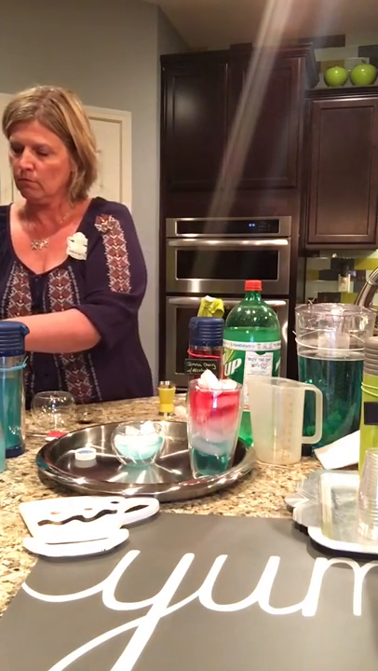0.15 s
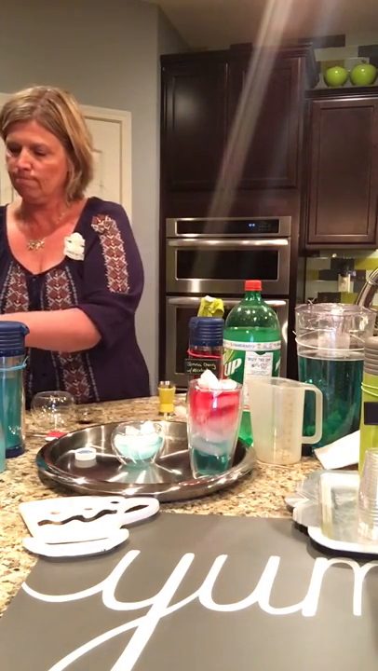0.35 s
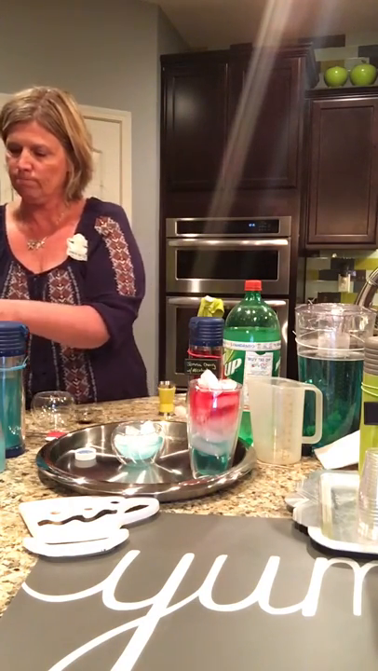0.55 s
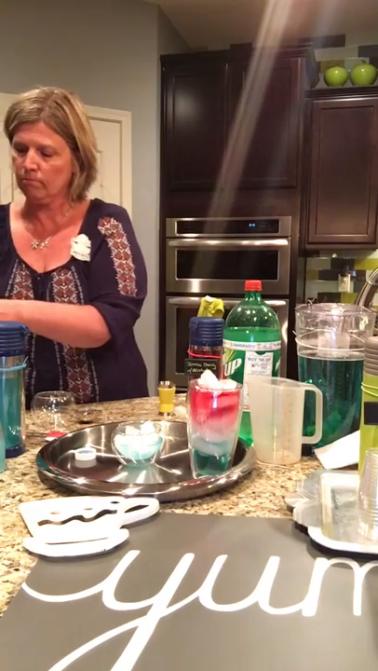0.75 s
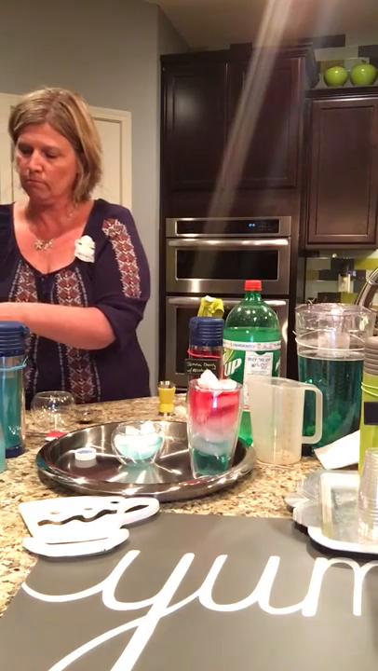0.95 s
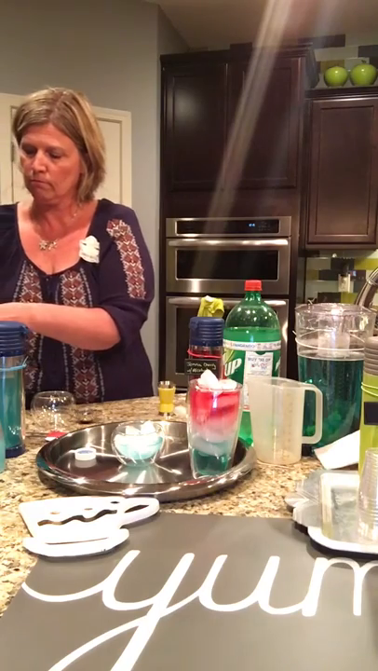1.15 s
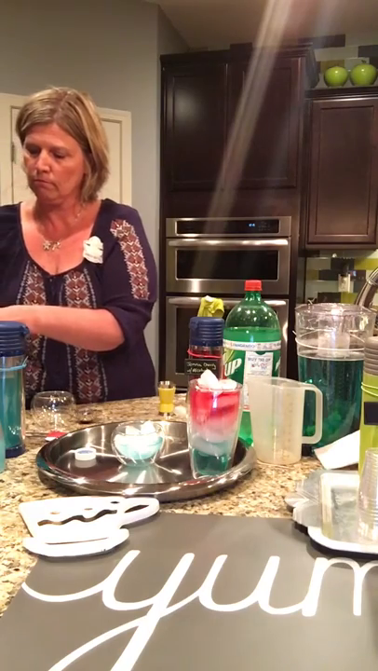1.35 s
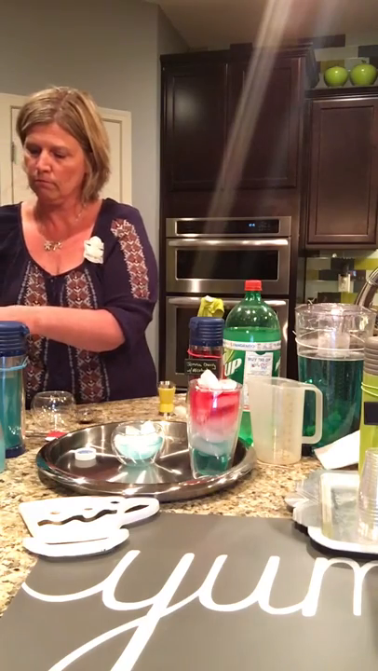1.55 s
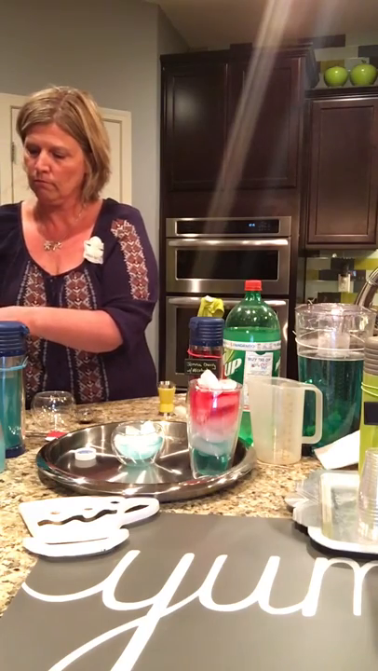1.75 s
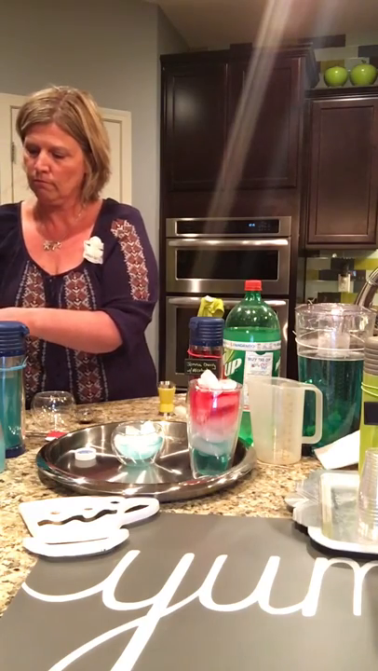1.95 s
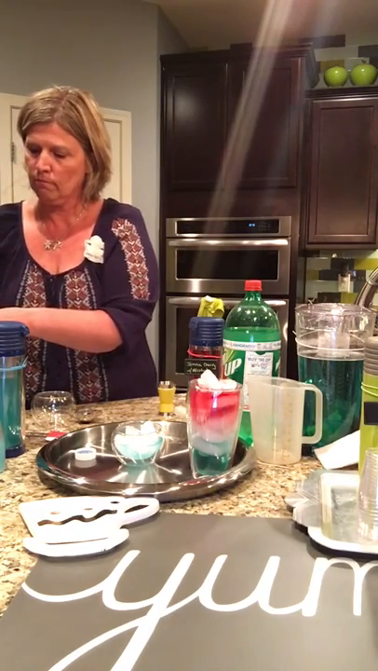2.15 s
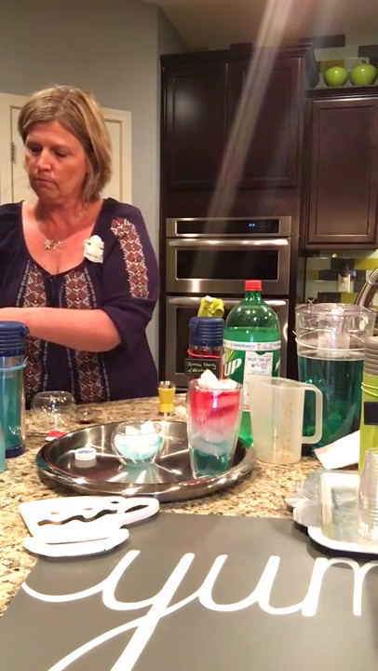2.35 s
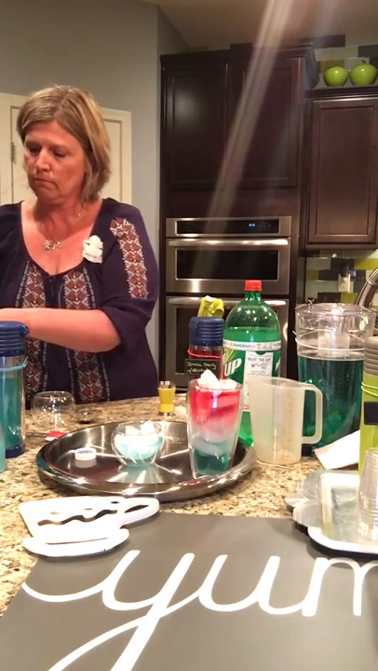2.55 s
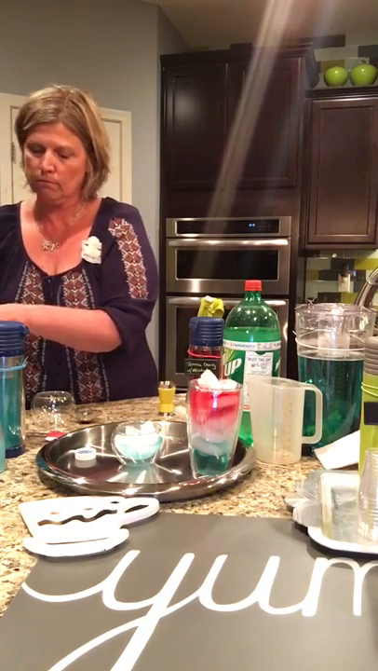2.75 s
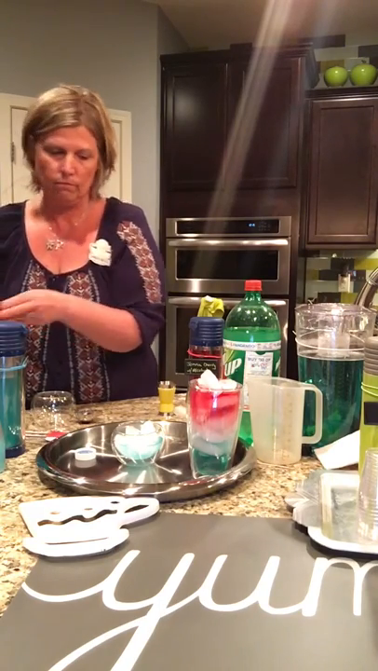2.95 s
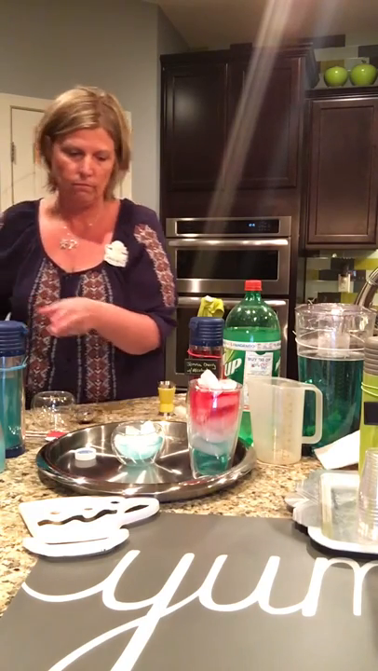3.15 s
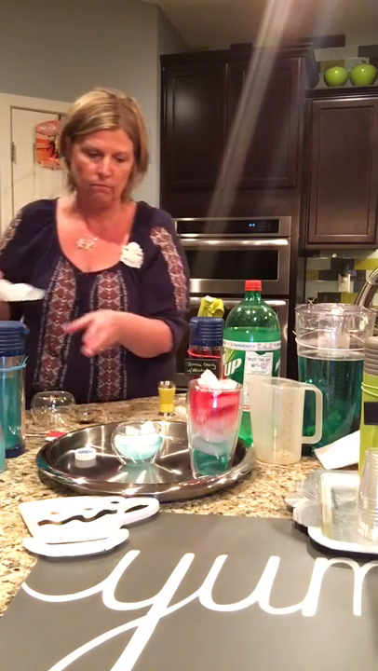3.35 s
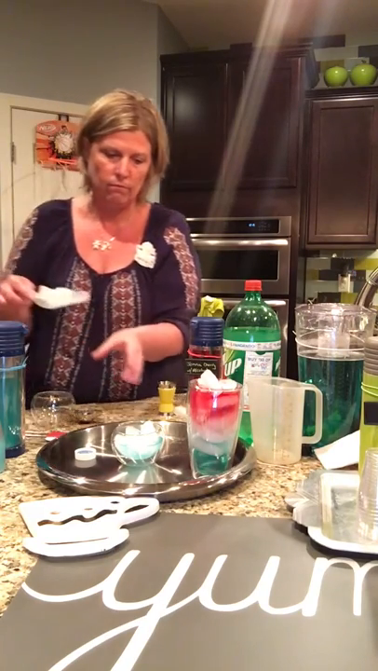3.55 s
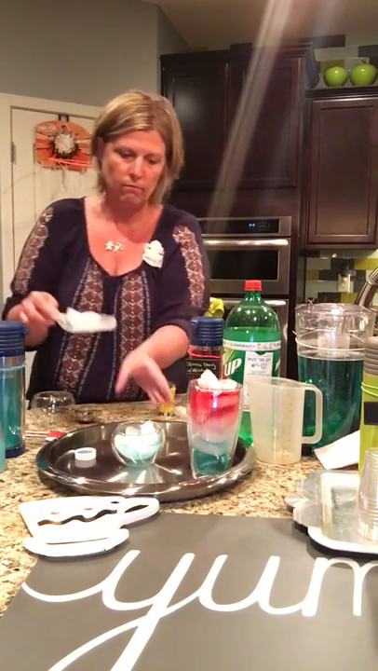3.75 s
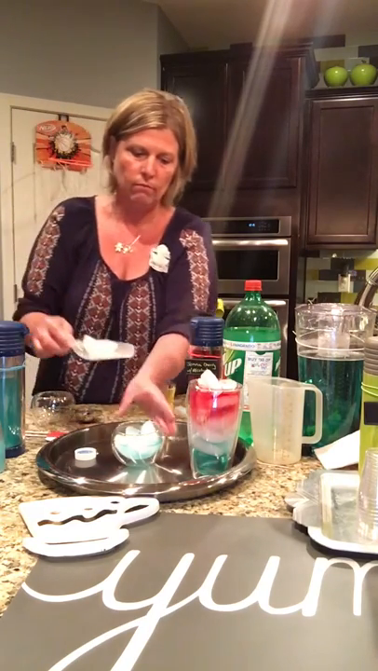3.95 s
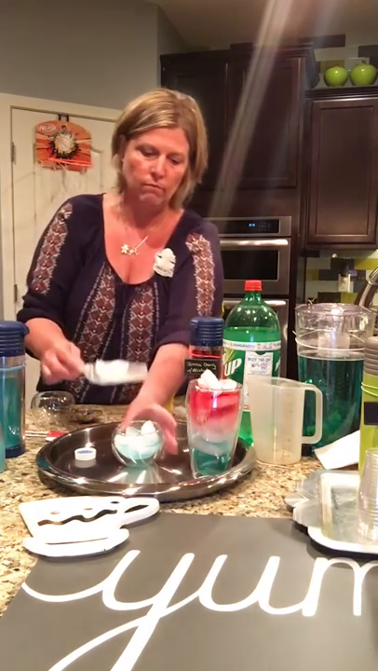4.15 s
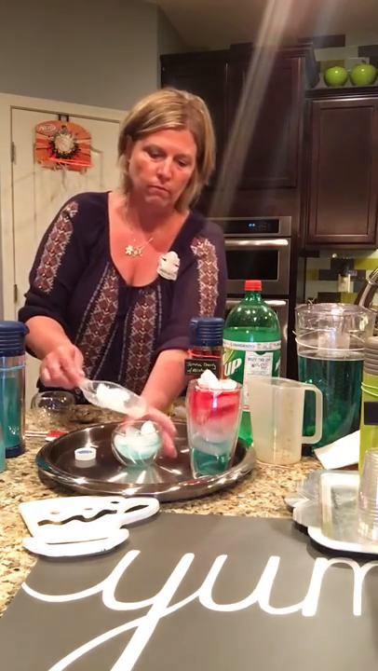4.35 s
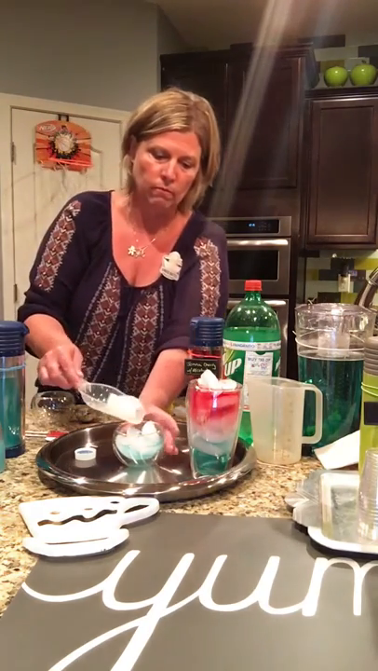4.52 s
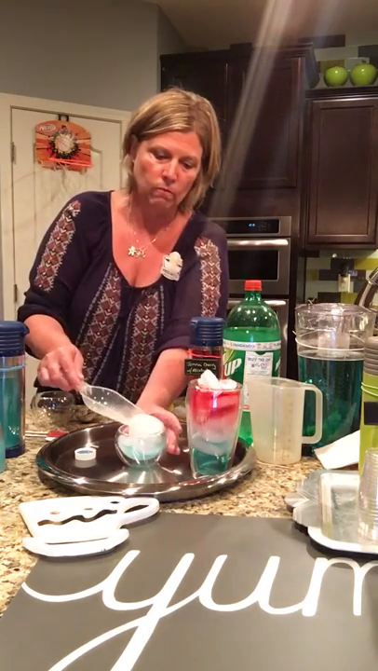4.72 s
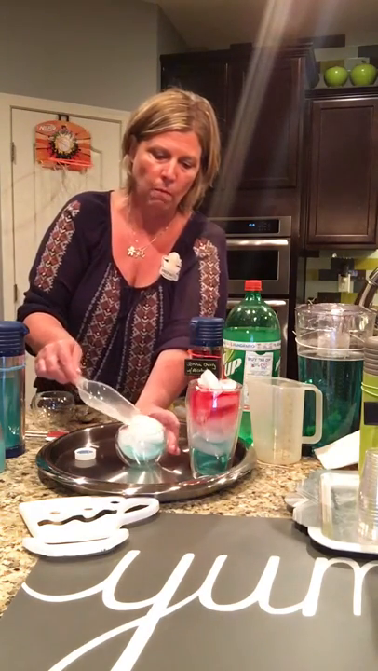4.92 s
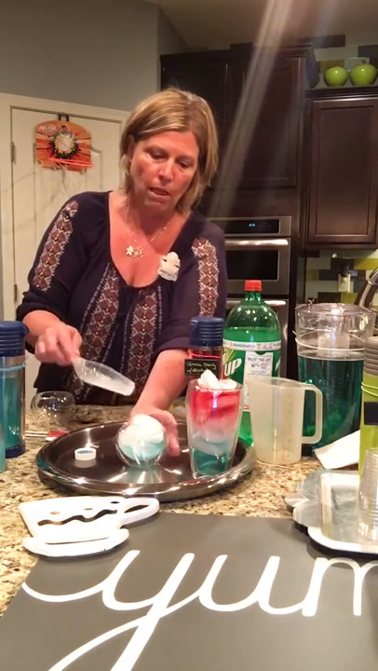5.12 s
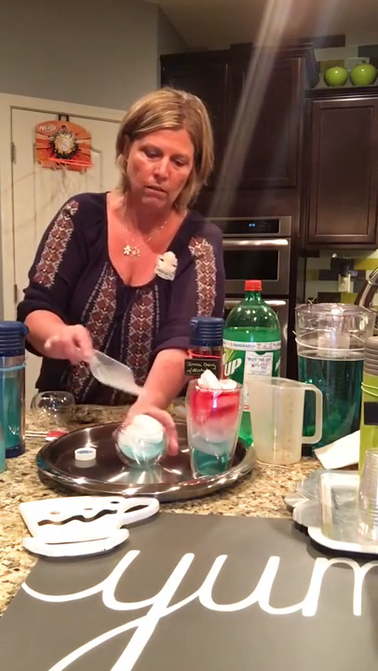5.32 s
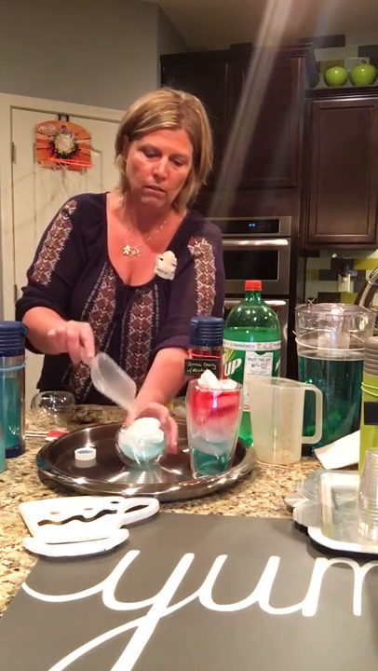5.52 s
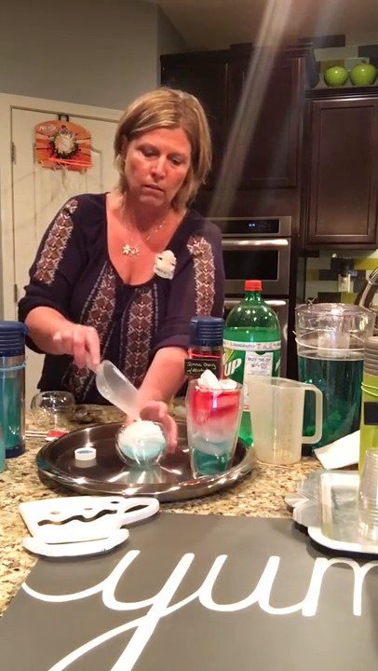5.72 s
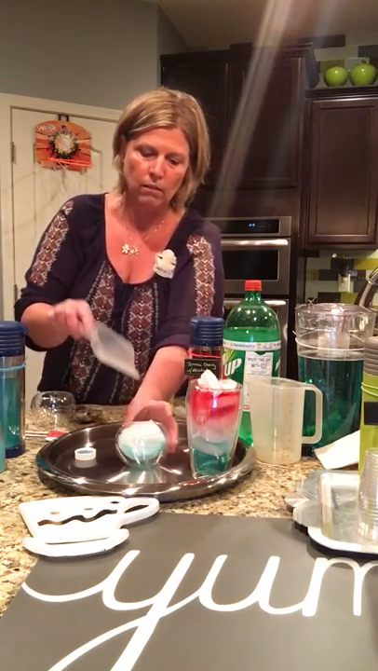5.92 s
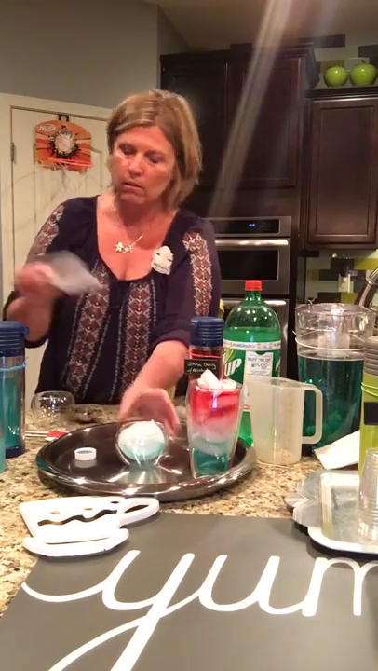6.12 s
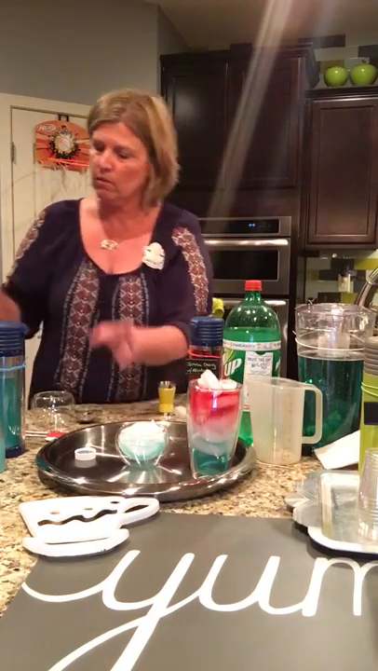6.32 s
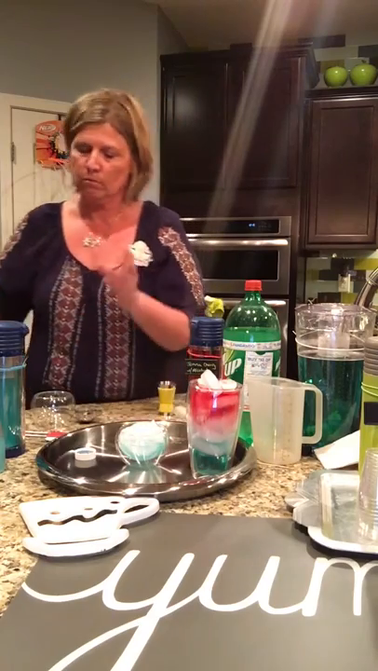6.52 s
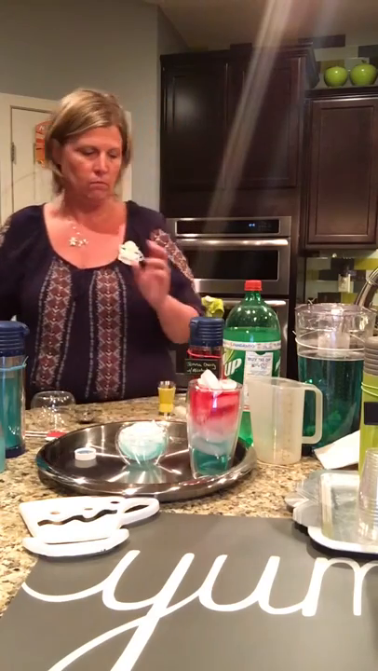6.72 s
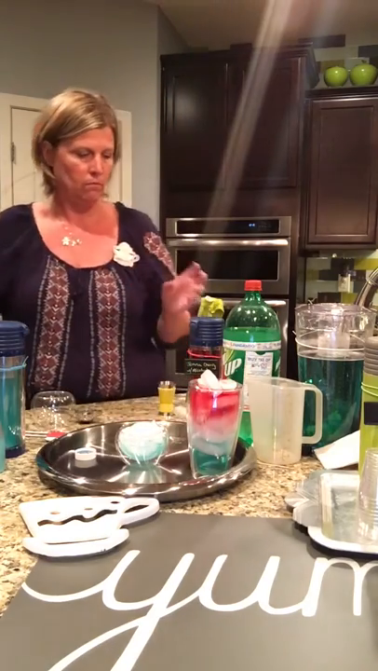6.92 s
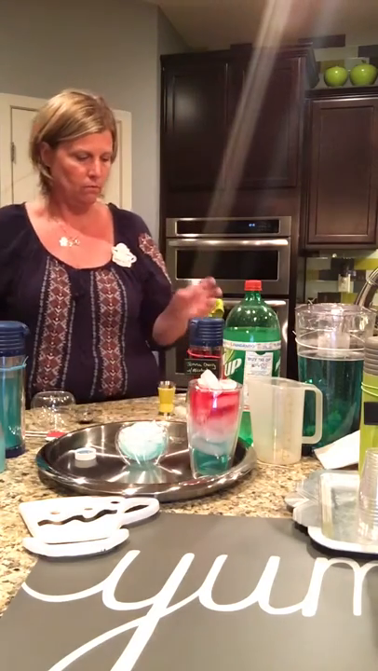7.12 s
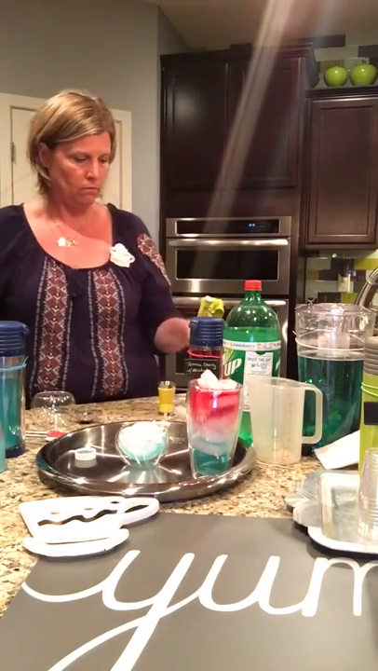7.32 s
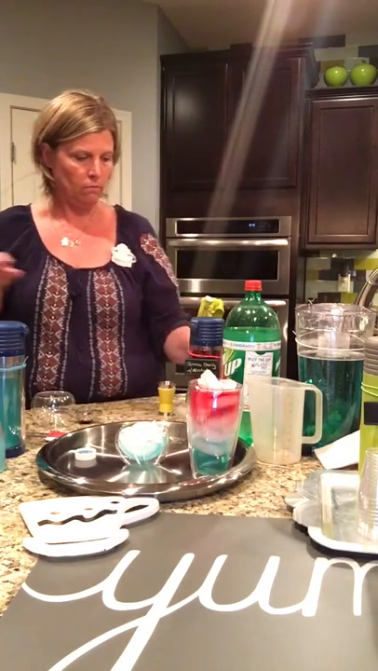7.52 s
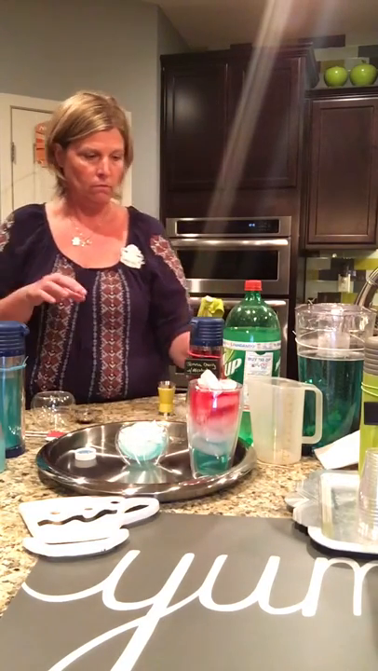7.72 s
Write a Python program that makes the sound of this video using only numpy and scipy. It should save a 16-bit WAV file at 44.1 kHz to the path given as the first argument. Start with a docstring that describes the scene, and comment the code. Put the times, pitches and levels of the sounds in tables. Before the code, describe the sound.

Ice crunches in a bin, then tumbles into a ringing glass before a plastic scoop is tossed back, over a faint fridge hum.

```python
"""A hard-walled kitchen, a phone's microphone a few steps from the counter. A fridge hums throughout.
For the first 3 s, off to the side, a plastic scoop digs in a bin of ice: cubes crack, the bin booms.
From 4 s cubes slide into a round glass on a steel tray and set it ringing; near 5.5 s the scoop taps
them down. At 6.6 s it is tossed back into the bin, bounces and settles. Tray and counter thump
under the heavier blows, and the walls answer every knock."""
import sys
import numpy as np
from scipy import signal
from scipy.fft import rfft, irfft, next_fast_len
from scipy.io import wavfile
from scipy.ndimage import map_coordinates

SR = 44100
rng = np.random.default_rng(int(sys.argv[2]) if len(sys.argv) > 2 else 0)


def wav_record(signal):
    """Record a signal, one row per channel, as 16-bit PCM in the file named by sys.argv[1]."""
    frames = np.transpose(np.atleast_2d(signal))
    bounded = np.clip(frames, -1, 1)
    # unit amplitude maps onto the largest positive 16-bit level
    quanta = np.round(bounded * 32767).astype(np.int16)
    wavfile.write(sys.argv[1], SR, quanta)


N = 347067
SPLIT_HZ = 1600  # a body's walls and air boom below this, its rim rings above


def amp(db):
    """Gain of a level in dB."""
    return 10 ** (np.asarray(db) / 20)


def unit(x):
    """x at rms 1."""
    return x / np.sqrt(np.mean(x ** 2) + 1e-20)


def along(points, hz):
    """A curve through (f/Hz, value) points on a log frequency axis, read at hz."""
    f, value = np.transpose(points)
    return np.interp(np.log(hz + 1), np.log(f + 1), value)


def wobble(rate):
    """A smooth random curve, rate knots a second."""
    return map_coordinates(rng.standard_normal(int(N * rate / SR) + 4), [np.arange(N) * rate / SR])


def filtered(x, response):
    """x through a filter given as a complex response of frequency."""
    size = next_fast_len(x.shape[-1] + SR // 4)
    return irfft(rfft(x, size) * response(np.fft.rfftfreq(size, 1 / SR)), size)[..., :x.shape[-1]]


def resonance(f, hz, width_hz):
    """One causal resonance, gain 1 at its centre."""
    return 1j * f * width_hz / (hz * hz - f * f + 1j * f * width_hz)


def body(modes):
    """The response of a struck body: its resonances in alternating sign."""
    return lambda f: sum((-1) ** k * amp(db) * resonance(f, hz, width)
                         for k, (hz, width, db) in enumerate(modes))


def booming(modes):
    """The low modes of a body, those of its walls and air."""
    return [mode for mode in modes if mode[0] < SPLIT_HZ]


def room_hush():
    """Room tone: steady noise, strongest in the bass."""
    # spectrum of the hush: f/Hz, relative level/dB
    spectrum = [(15, -32.5), (25, -40), (53, -4.5), (120, -4.5), (217, -5.5), (270, -8), (363, -10),
                (416, -8), (489, -17), (1840, -27), (2350, -29), (4140, -30.5), (7710, -36.5),
                (12200, -35.5), (16000, -40)]
    return amp(-61.0) * unit(filtered(rng.standard_normal(N), lambda f: amp(along(spectrum, f))))


def fridge():
    """The fridge in the background: fan rumble under nearly steady motor tones."""
    # noise bands of the fan: f/Hz, width/Hz, rms level/dB
    fan_bands = [(73.7, 2.3, -72), (118.5, 18.3, -63.5), (346.4, 35, -74.5)]
    # tones of the motor: f/Hz, rms level/dB
    motor_tones = [(269, -71), (419.3, -62.5), (2363, -88)]
    rumble = sum(amp(db) * unit(filtered(rng.standard_normal(N), lambda f: resonance(f, hz, width) ** 2))
                 for hz, width, db in fan_bands)
    motor_time = np.cumsum(1 + 0.003135 * wobble(4.5)) / SR  # the tones drift in pitch together
    tones = sum(amp(db + 0.76 * wobble(12)) * np.sqrt(2) * np.sin(2 * np.pi * hz * motor_time)
                for hz, db in motor_tones)
    return rumble + tones


def walls(sound, delay_s):
    """Hard walls answer, each frequency dying at its own speed."""
    # strength of the answer: f/Hz, gain/dB
    answer = [(150, 2), (650, -5), (1500, -1.5), (4000, -2), (12000, 2)]
    # reverberation time: f/Hz, t60/s
    decay = [(150, 0.81), (500, 0.29), (1500, 0.51), (4000, 0.4), (10000, 0.39), (16000, 0.13)]
    sent = filtered(sound, lambda f: amp(along(answer, f)))
    out = np.zeros(N + 3 * SR)
    step = SR // 3  # moving sources meet new paths every third of a second
    for start in range(0, N, step):
        hz, t, noise = signal.stft(rng.standard_normal(SR), SR, nperseg=256)
        tail = signal.istft(noise * amp(-60 * t / along(decay, hz)[:, None]), SR, nperseg=256)[1]
        echo = signal.fftconvolve(sent[start:start + step], tail / np.linalg.norm(tail))
        out[start + round(delay_s * SR):][:len(echo)] += echo
    return out[:N]


def counter():
    """Tray and counter thump under the heavier blows, each time one low note that soon dies."""
    # thumps: t/s, level/dB, f/Hz
    thumps = [(0.061, -44, 179), (1.354, -42, 180), (1.608, -44.5, 150), (2.17, -46.5, 159),
              (4.7, -45, 159), (4.784, -36.5, 211), (5.476, -44, 160), (5.747, -37, 165), (6.646, -46, 158),
              (6.96, -42.5, 215), (6.989, -41, 210)]
    attack_s, width_hz = 0.00095, 22.5
    out, t = np.zeros(N + SR), np.arange(SR // 2) / SR
    envelope = (1 - np.exp(-t / attack_s)) * np.exp(-np.pi * width_hz * t)
    for at_s, db, hz in thumps:
        out[round(at_s * SR):][:len(t)] += amp(db) * envelope * np.sin(2 * np.pi * hz * t)
    return out[:N]


def surges(table, fall_db_per_s):
    """How strongly the loose cubes move: each surge builds up to its peak, then dies away steadily."""
    t = np.arange(N) / SR
    build_db = 29  # growth over one build-up time
    return sum(amp(db - np.where(t < peak_s,
                                 build_db * (peak_s - t) / build_s, fall_db_per_s * (t - peak_s)))
               for peak_s, db, build_s in table)


def shifting(level, modes, drum_db, per_second, spread_db, grain_s, tilt_db_per_octave):
    """Many tiny collisions of unequal size, each a puff of noise: cubes crackle and drum on the body."""
    # spectrum of crackling ice: f/Hz, relative level/dB
    spectrum = [(400, -1), (1200, -1), (3000, -1), (6000, -7.5), (10000, -21), (14000, -18.5), (16000, -28)]
    ticks = (rng.random((2, N)) < per_second / SR) * amp(spread_db * rng.standard_normal((2, N)))
    puffs = signal.lfilter([1], [1, -np.exp(-1 / (grain_s * SR))], ticks) * rng.standard_normal((2, N))
    hollow = body(booming(modes))
    colour = lambda f: amp(along(spectrum, f) + tilt_db_per_octave * np.log2((f + 1) / 3000))
    drum = filtered(level * puffs[0], hollow) / np.std(filtered(puffs[0], hollow))
    crackle = filtered(level * puffs[1], colour) / np.std(filtered(puffs[1], colour))
    return amp(drum_db) * drum + crackle


def knocks(contacts, modes, crack_width_ratio, ring_db, snap, crack_t60_s, roughness,
           sparkle_hz, sparkle_width_hz):
    """Each contact is a short pitched crack, a bright sparkle, a hollow boom and a ring of the rim."""
    at_s, crack_db, crack_hz, boom_db, boom_hz, sparkle_db = np.transpose(contacts)[:, :, None]
    t = np.arange(SR // 5) / SR
    touch = signal.unit_impulse(len(t))
    splinters = rng.standard_normal((len(contacts), 4, len(t))) * amp(-60 * t / crack_t60_s)
    cracks = filtered(snap * touch + splinters[:, 0],
                      lambda f: resonance(f, crack_hz, crack_width_ratio * crack_hz) ** 2)
    sparkles = filtered(2.8 * touch + splinters[:, 1],
                        lambda f: resonance(f, sparkle_hz, sparkle_width_hz) ** 2)
    low_modes = booming(modes)
    hollow, rim = body(low_modes), body(modes[len(low_modes):])
    # the spot that is struck favours the modes near one pitch; a little of the blunt push passes beneath
    booms = filtered(touch + roughness * splinters[:, 2],
                     lambda f: hollow(f) * (0.28 + resonance(f, boom_hz, 0.14 * boom_hz)))
    rings = filtered(touch + roughness * splinters[:, 3],
                     lambda f: rim(f) * resonance(f, crack_hz, 0.69 * crack_hz) ** 2)
    layers = [(crack_db, cracks), (sparkle_db, sparkles), (boom_db, booms), (crack_db + ring_db, rings)]
    hits = sum(amp(db) * part / np.abs(part).max(axis=-1, keepdims=True) for db, part in layers)
    samples = np.round(at_s * SR).astype(int) + np.arange(len(t))
    return np.bincount(samples.ravel(), hits.ravel(), N + SR)[:N]


def ice_bin():
    """Off to the side the scoop digs among the cubes, which knock and drum on the bin."""
    # resonances of the bin: f/Hz, width/Hz, gain/dB
    modes = [(684, 162, 9.5), (736, 125, 2.5), (956, 52, -5), (1326, 260, -4), (1435, 38, 0.5),
             (2000, 120, 9.5), (2470, 110, -41), (3076, 170, 3), (4390, 260, 5), (5530, 150, 6)]
    # contacts: t/s, crack level/dB, crack f/Hz, boom level/dB, boom f/Hz, sparkle level/dB
    digging = [(0.0185, -45, 3100, -55, 684, -69), (0.0508, -39, 2670, -31, 613, -69),
               (0.0737, -37, 2010, -40, 620, -62), (0.1184, -43, 3020, -36.5, 650, -69),
               (0.1345, -44, 2580, -36.5, 666, -72), (0.1526, -32.5, 2690, -46, 630, -73),
               (0.1824, -44, 2900, -40, 690, -73), (0.2204, -48, 1530, -36.5, 684, -69),
               (0.2544, -50, 2070, -65, 764, -69), (0.3509, -51, 1890, -48, 640, -76),
               (0.9373, -57.5, 1640, -60, 622, -67), (1.063, -47.5, 2850, -61, 640, -52),
               (1.1368, -56, 1620, -58, 650, -73), (1.154, -44, 3300, -46, 990, -70),
               (1.3244, -42, 2600, -43, 645, -52), (1.3543, -19.5, 2630, -23, 1320, -48),
               (1.3614, -26, 2880, -31, 1440, -39), (1.3954, -32, 2200, -47, 700, -46),
               (1.4036, -17.5, 4600, -35.5, 645, -21.5), (1.4104, -38, 4200, -54, 653, -22),
               (1.4296, -25.5, 3400, -52, 1420, -57), (1.445, -44, 4190, -54, 1340, -70),
               (1.4828, -35, 4200, -37.5, 670, -70), (1.499, -36, 2910, -65, 666, -68),
               (1.5783, -33, 3570, -33, 557, -39.5), (1.6085, -36.5, 2280, -34.5, 756, -60),
               (1.6564, -56, 2720, -36.5, 656, -64), (1.7174, -62, 2360, -36, 630, -65),
               (1.7414, -43.5, 1610, -44, 730, -44.5), (1.9929, -66, 3200, -49, 606, -76),
               (2.0143, -43.5, 2030, -45.5, 770, -49.5), (2.0454, -45.5, 1470, -45, 1000, -53),
               (2.1268, -50, 2460, -44, 1180, -51), (2.1494, -48, 2670, -46, 640, -49),
               (2.1665, -40, 2670, -39.5, 684, -44), (2.1744, -47, 2410, -38.5, 690, -41),
               (2.1844, -41.5, 1970, -52, 770, -44), (2.1924, -52, 2160, -41, 710, -45),
               (2.3087, -50, 2740, -45, 940, -51), (2.3444, -52, 2800, -50, 643, -44.5),
               (2.4732, -57, 2960, -51, 755, -62), (2.4937, -53, 3160, -57, 681, -71),
               (2.5237, -51, 3080, -44.5, 665, -54), (2.7661, -53, 3280, -53.5, 705, -76),
               (2.967, -50, 2900, -73, 576, -47.5)]
    # surges of stirred cubes: peak t/s, level/dB, build-up/s
    stir = [(0.0, -53, 0.3), (0.2, -62, 0.043), (1.07, -69, 0.34), (1.27, -63.5, 0.25), (1.42, -62.5, 0.45),
            (1.6, -53, 0.1), (1.8, -67, 0.23), (2.03, -75, 0.076), (2.2, -66, 0.48), (2.39, -64.5, 0.58),
            (2.97, -78, 0.33)]
    hits = knocks(digging, modes, crack_width_ratio=0.72, ring_db=-7.5, snap=1.9, crack_t60_s=0.02,
                  roughness=0.17, sparkle_hz=8600, sparkle_width_hz=26000)
    return hits + shifting(surges(stir, fall_db_per_s=97), modes, drum_db=3.0, per_second=690,
                           spread_db=1, grain_s=0.0017, tilt_db_per_octave=0.4)


def tossed_scoop():
    """The plastic scoop lands in the bin, bounces and settles on the ice."""
    # resonances of the scoop: f/Hz, width/Hz, gain/dB
    modes = [(445, 62, -7), (675, 160, 6), (1000, 33, 5), (1147, 130, 2.5), (1263, 103, 5.5),
             (1307, 123, 4), (1950, 160, -9), (2960, 120, -7.5), (4240, 410, -2)]
    # contacts: t/s, crack level/dB, crack f/Hz, boom level/dB, boom f/Hz, sparkle level/dB
    bounces = [(6.5927, -33, 2060, -30, 1230, -40), (6.6108, -60, 1900, -62, 1150, -43.5),
               (6.6384, -49, 1670, -29.5, 1030, -60), (6.6443, -40, 1820, -39, 1120, -61),
               (6.6608, -32.5, 1590, -37, 1200, -52), (6.6664, -35, 1500, -36, 1350, -65),
               (6.6711, -35, 2900, -37, 1400, -56), (6.6814, -44, 2270, -46, 920, -48),
               (6.7039, -36, 2100, -33.5, 1220, -39), (6.7542, -45, 1890, -42.5, 1200, -43),
               (6.8094, -67, 1940, -41, 646, -63), (6.9055, -39, 2100, -50, 1090, -70),
               (6.9194, -28, 2700, -36, 1400, -63), (6.9402, -55, 1790, -41, 706, -39),
               (6.9592, -33, 1910, -25.5, 1160, -29.5), (6.9865, -31.5, 1600, -20.5, 1160, -32),
               (6.9932, -27, 2040, -25, 1000, -51), (7.0022, -32, 1620, -42, 1030, -41),
               (7.0101, -26.5, 2900, -29, 1120, -35), (7.0282, -37, 1720, -49, 1150, -47),
               (7.049, -30.5, 3000, -44, 1090, -53), (7.0693, -41, 1490, -44, 1140, -42),
               (7.0979, -39.5, 2310, -44, 1340, -60), (7.197, -40.5, 2600, -41.5, 1110, -68),
               (7.272, -50.5, 2910, -53, 1210, -76)]
    # surges of settling cubes: peak t/s, level/dB, build-up/s
    settle = [(6.65, -50.5, 0.043), (6.77, -55.5, 0.27), (6.94, -40.5, 0.039), (7.08, -60.5, 0.25)]
    hits = knocks(bounces, modes, crack_width_ratio=1.0, ring_db=-4.5, snap=1.3, crack_t60_s=0.026,
                  roughness=0.18, sparkle_hz=9100, sparkle_width_hz=8300)
    return hits + shifting(surges(settle, fall_db_per_s=129), modes, drum_db=1.5, per_second=290,
                           spread_db=10.5, grain_s=0.01, tilt_db_per_octave=0.5)


def glass():
    """Cubes slide off the scoop and strike the glass, damped by ice and hand; the scoop taps them down."""
    # resonances of the glass: f/Hz, width/Hz, gain/dB
    modes = [(319, 56, 14.5), (567, 69, 13.5), (1155, 174, 11), (2365, 18, -1.5), (3400, 100, -25),
             (3380, 80, -40), (4170, 44, -1.5), (5430, 110, -11), (6070, 91, -1.5), (9100, 63, -9),
             (14800, 220, -8)]
    # cubes landing: t/s, crack level/dB, crack f/Hz, boom level/dB, boom f/Hz, sparkle level/dB
    filling = [(3.9977, -57, 2460, -65, 482, -76), (4.0911, -58, 1810, -66, 738, -60),
               (4.1293, -55, 1600, -63, 1130, -40), (4.17, -51, 3250, -55, 1490, -42.5),
               (4.3745, -55, 2470, -50, 1170, -68), (4.4623, -48, 5300, -66, 482, -74),
               (4.47, -49, 4100, -51, 1040, -70), (4.4893, -44, 4220, -65, 490, -68),
               (4.572, -51, 3500, -59, 1170, -69), (4.6112, -65, 3700, -52, 1150, -67),
               (4.6643, -53, 4600, -67, 1160, -63), (4.6891, -32.5, 5230, -37.5, 1270, -30),
               (4.739, -57, 1890, -59, 1020, -59), (4.7596, -28, 2720, -43, 1280, -58),
               (4.7774, -53, 6090, -36, 547, -54), (4.789, -27.5, 5100, -32.5, 560, -60),
               (4.79, -27.5, 2080, -31, 1100, -35), (4.8091, -34, 2290, -34.5, 587, -40),
               (4.8352, -32.5, 4170, -56, 1280, -51), (4.8619, -34, 2600, -41, 1120, -46),
               (4.8924, -41, 2840, -47, 996, -50), (4.8984, -32, 2460, -48, 581, -41),
               (4.9588, -30, 3840, -48, 1120, -61), (4.9997, -44, 4300, -44, 1070, -46),
               (5.0144, -49, 2650, -62, 1170, -43)]
    # scoop on the cubes: t/s, crack level/dB, crack f/Hz, boom level/dB, boom f/Hz, sparkle level/dB
    tapping = [(5.467, -27, 3580, -40.5, 965, -54), (5.5074, -58, 3510, -52, 1140, -44),
               (5.523, -38, 3000, -48, 1260, -59), (5.55, -36, 3450, -60, 536, -68),
               (5.587, -51, 2460, -48, 1190, -73), (5.6056, -49, 2340, -68, 568, -69),
               (5.683, -38.5, 2350, -49, 546, -70), (5.7423, -25.5, 3330, -35, 955, -43),
               (5.7498, -33.5, 2770, -40.5, 1120, -31), (5.7952, -35, 3100, -48, 1250, -60),
               (5.8024, -39.5, 1990, -44.5, 1220, -61), (5.8138, -37, 2330, -47, 1200, -64),
               (5.8232, -42, 1990, -57, 600, -69)]
    # surges of sliding cubes: peak t/s, level/dB, build-up/s
    slide = [(4.0, -77, 0.3), (4.17, -66, 0.3), (4.6, -71, 0.19), (4.76, -53, 0.27), (4.9, -60.5, 0.2),
             (5.03, -65, 0.28), (5.52, -54.5, 0.076), (5.71, -67, 0.057), (5.82, -56.5, 0.26)]
    hits = knocks(filling, modes, crack_width_ratio=0.66, ring_db=-6.5, snap=2.0, crack_t60_s=0.023,
                  roughness=0.18, sparkle_hz=13500, sparkle_width_hz=41000)
    taps = knocks(tapping, modes, crack_width_ratio=0.81, ring_db=-12.5, snap=2.9, crack_t60_s=0.016,
                  roughness=0.14, sparkle_hz=11000, sparkle_width_hz=20000)
    return hits + taps + shifting(surges(slide, fall_db_per_s=142), modes, drum_db=-0.5, per_second=1100,
                                  spread_db=3.5, grain_s=0.0017, tilt_db_per_octave=1.0)


def scene():
    """The kitchen at the microphone, in mono: the bin, farther off, carries more room than the glass."""
    digging, filling, toss, thumps = ice_bin(), glass(), tossed_scoop(), counter()
    direct = digging + filling + toss + thumps
    to_walls = amp(0.5) * digging + amp(-8.5) * filling + amp(-0.5) * toss + amp(-3) * thumps
    return (direct + walls(to_walls, delay_s=0.006) + fridge() + room_hush())[None]


def record(dry):
    """The microphone rolls off deep bass and high treble; the phone keeps nothing above its band limit."""
    bass_hz, treble_hz, limit_hz = 35, 15200, 15900
    microphone = lambda f: 1j * f / (bass_hz + 1j * f) / (1 + (f / treble_hz) ** 8)
    return filtered(dry, lambda f: (f < limit_hz) * microphone(f))


dry = scene()
out = record(dry)
wav_record(out)
```